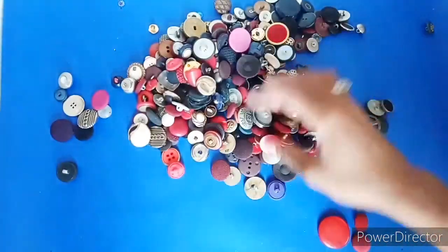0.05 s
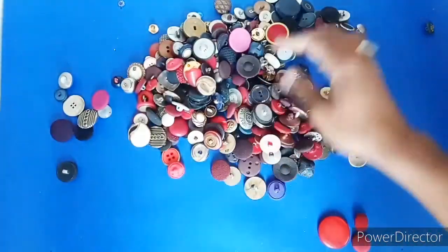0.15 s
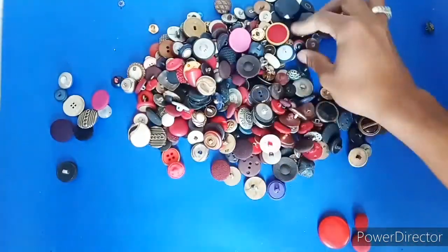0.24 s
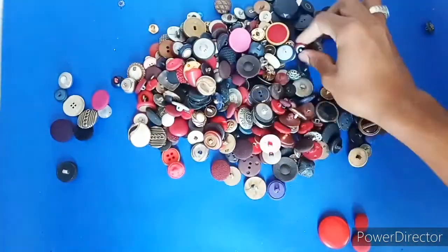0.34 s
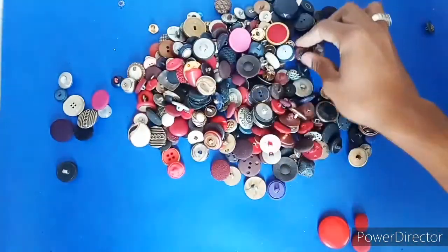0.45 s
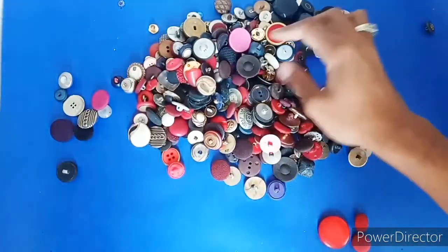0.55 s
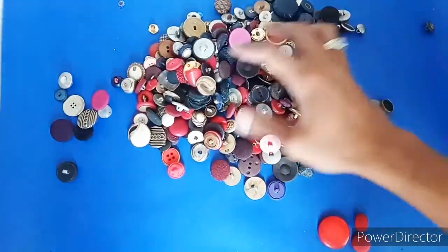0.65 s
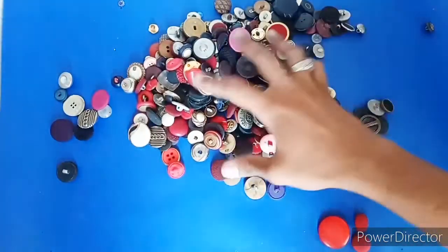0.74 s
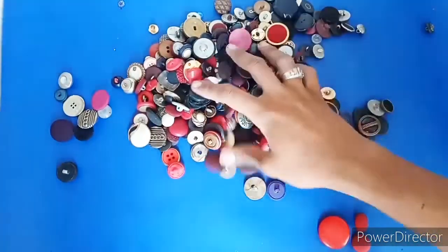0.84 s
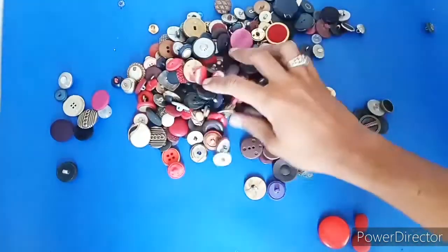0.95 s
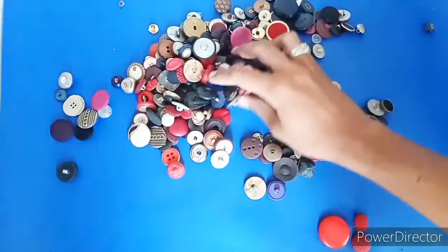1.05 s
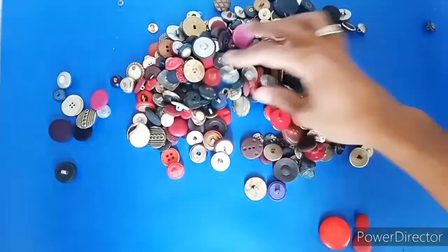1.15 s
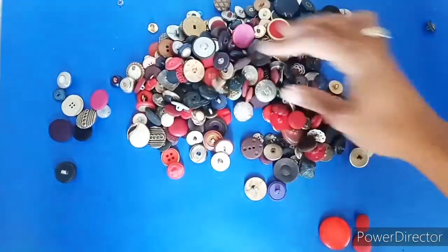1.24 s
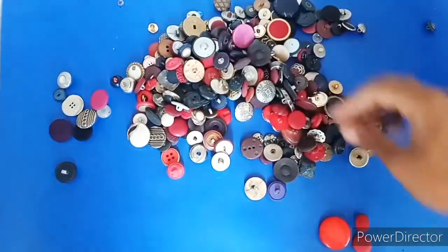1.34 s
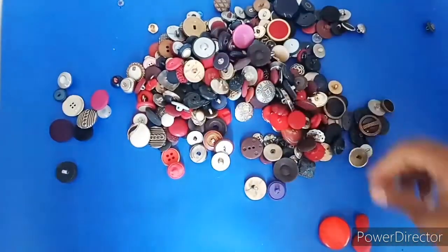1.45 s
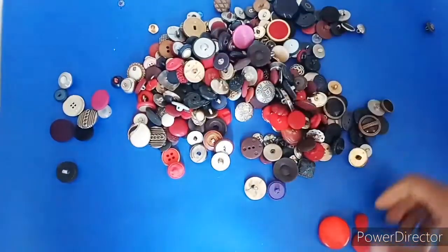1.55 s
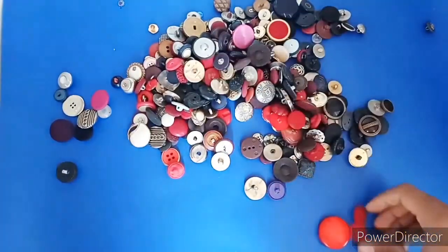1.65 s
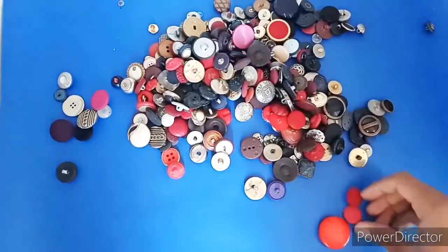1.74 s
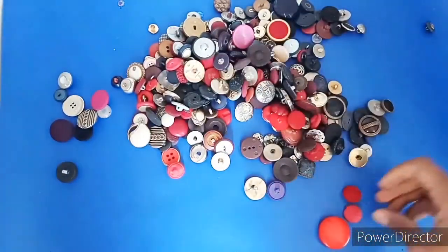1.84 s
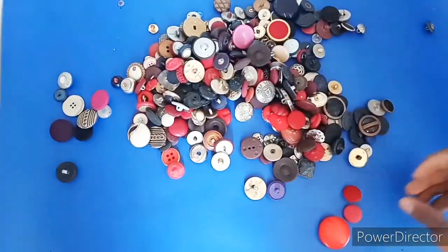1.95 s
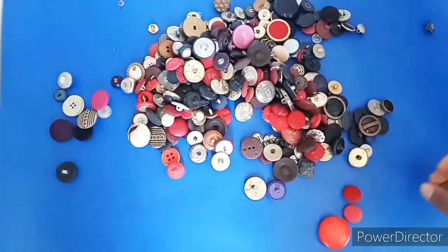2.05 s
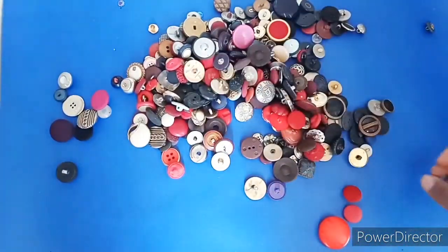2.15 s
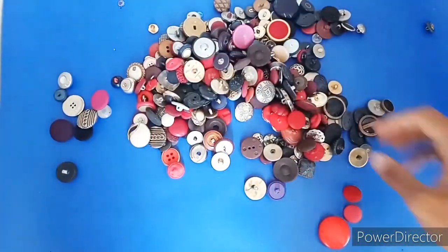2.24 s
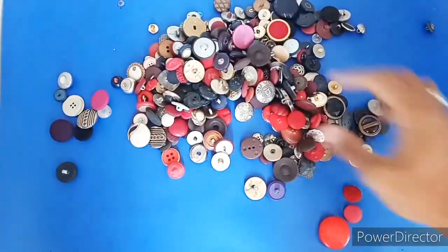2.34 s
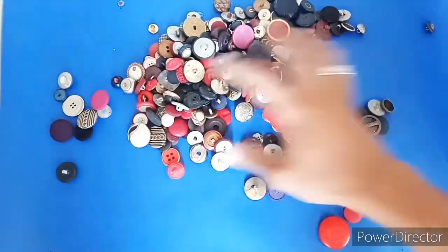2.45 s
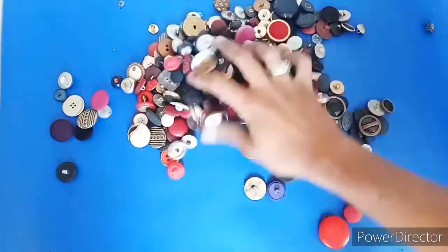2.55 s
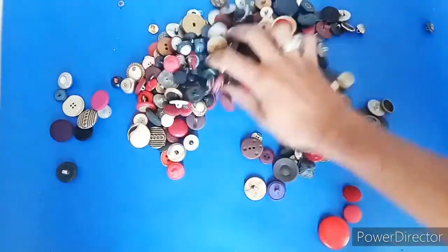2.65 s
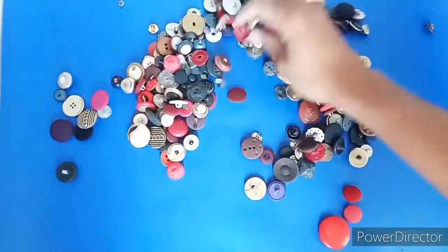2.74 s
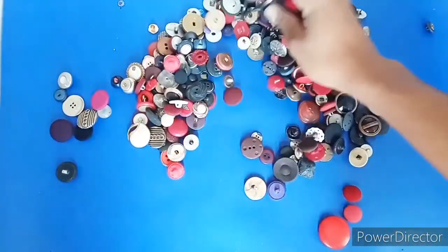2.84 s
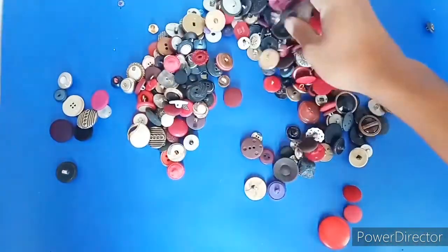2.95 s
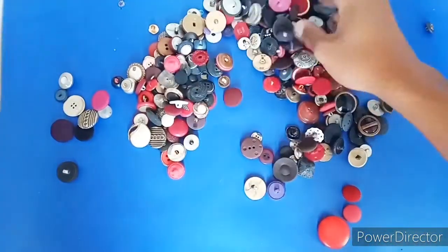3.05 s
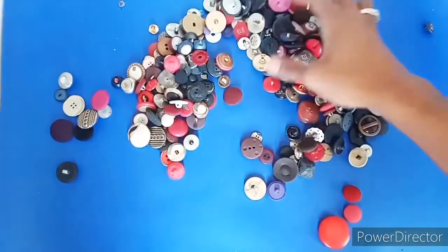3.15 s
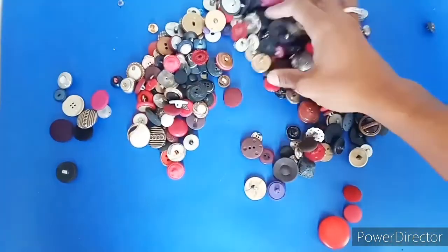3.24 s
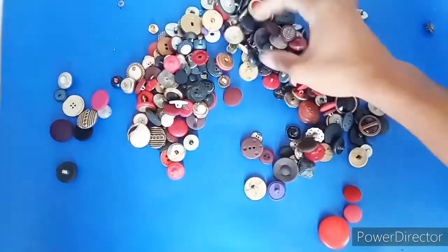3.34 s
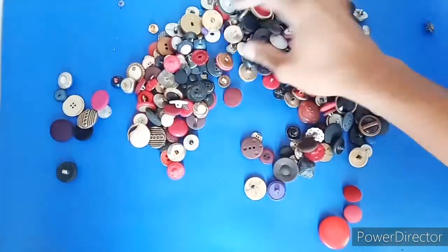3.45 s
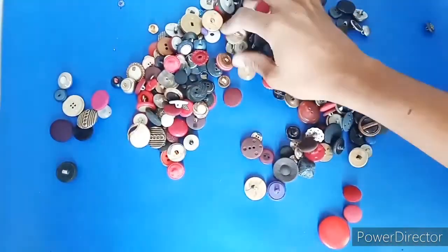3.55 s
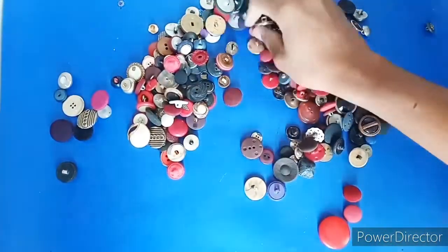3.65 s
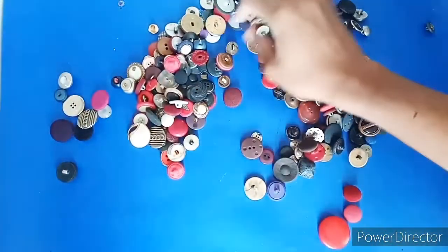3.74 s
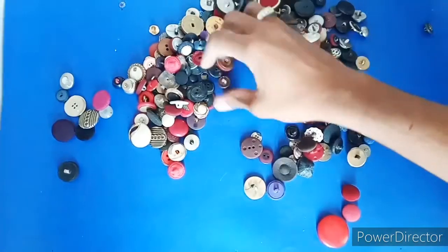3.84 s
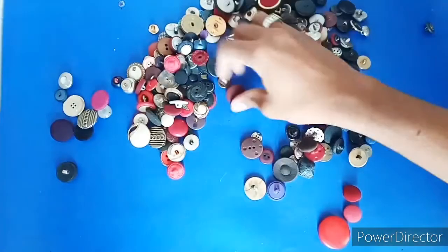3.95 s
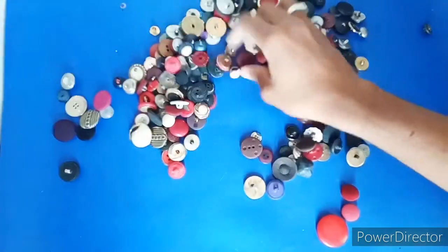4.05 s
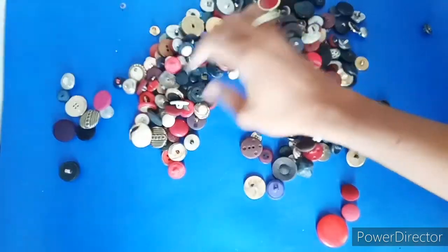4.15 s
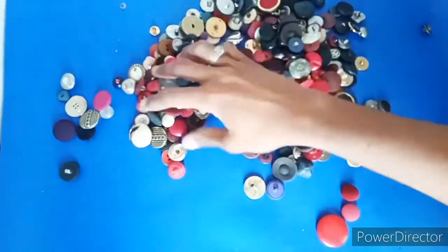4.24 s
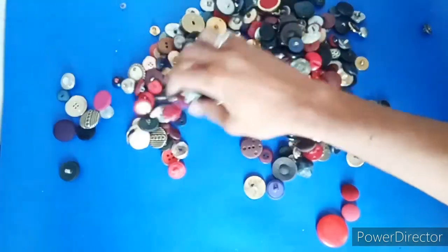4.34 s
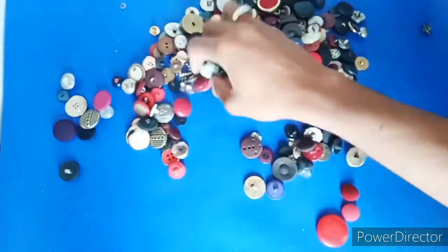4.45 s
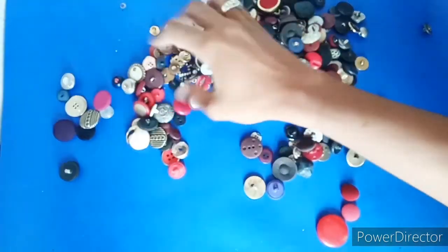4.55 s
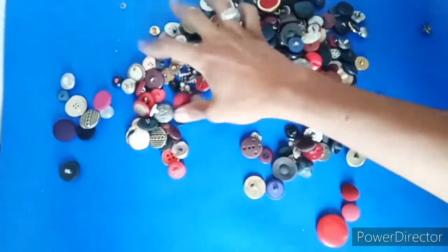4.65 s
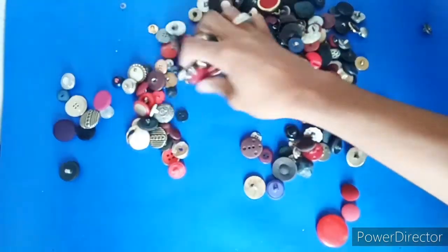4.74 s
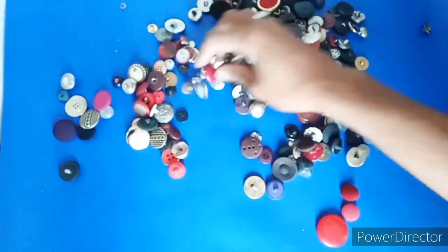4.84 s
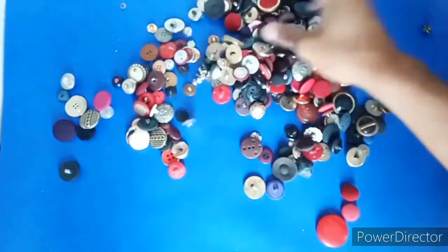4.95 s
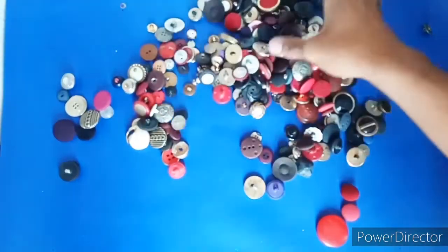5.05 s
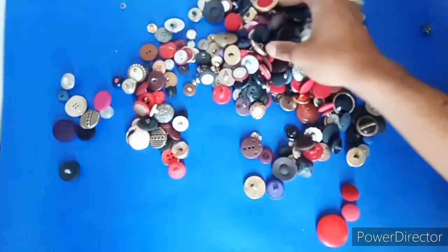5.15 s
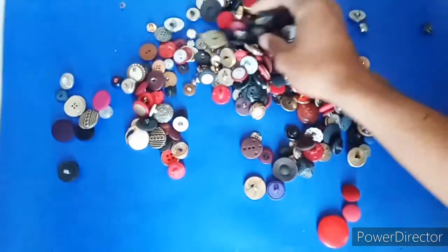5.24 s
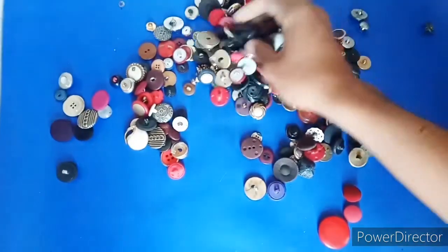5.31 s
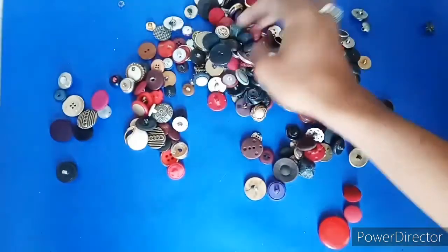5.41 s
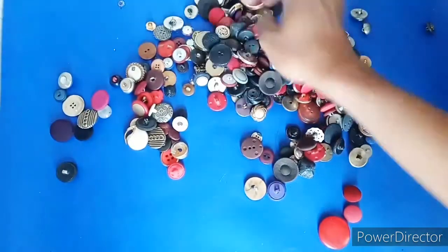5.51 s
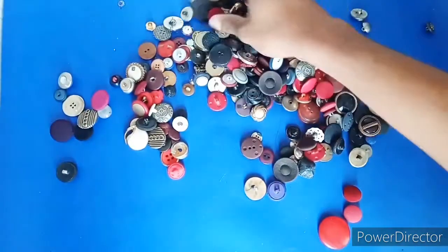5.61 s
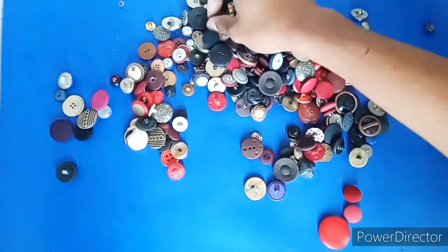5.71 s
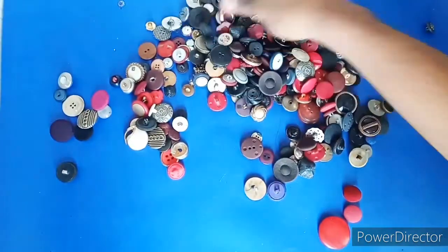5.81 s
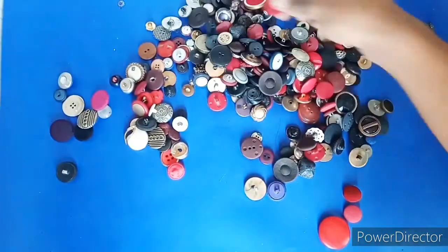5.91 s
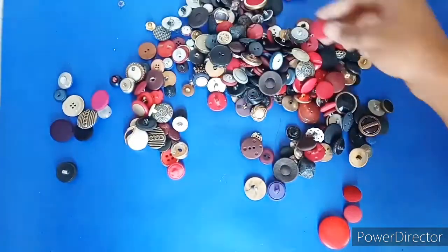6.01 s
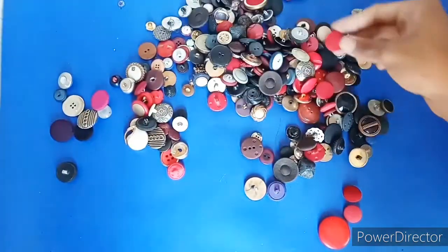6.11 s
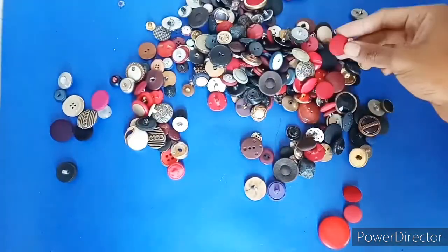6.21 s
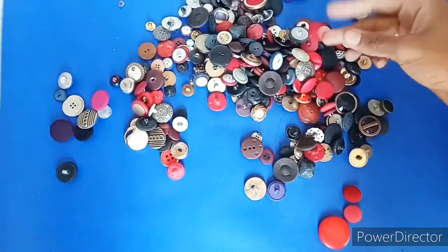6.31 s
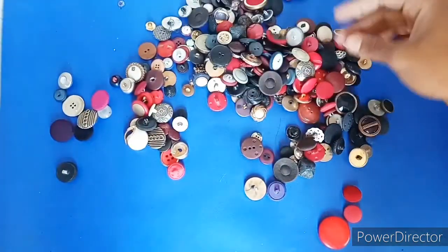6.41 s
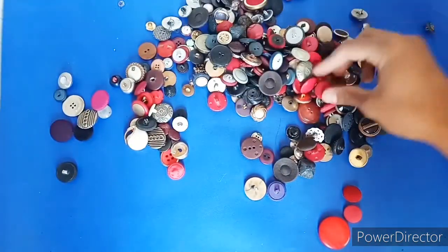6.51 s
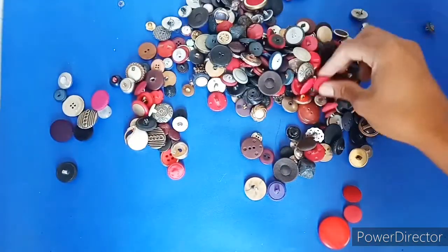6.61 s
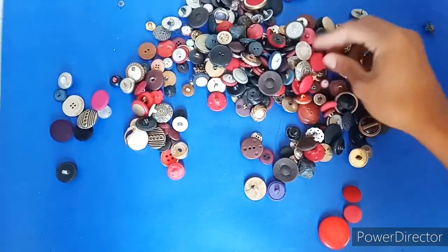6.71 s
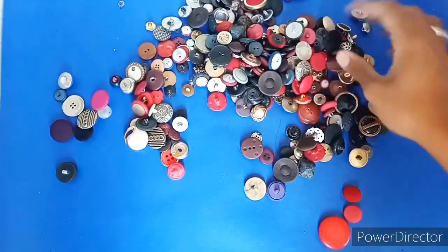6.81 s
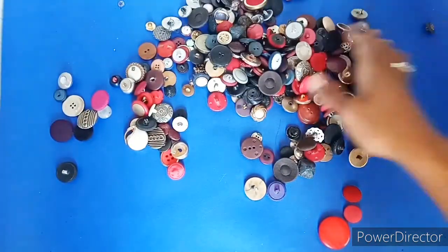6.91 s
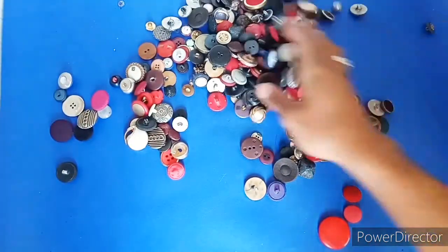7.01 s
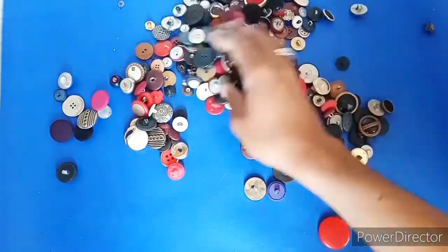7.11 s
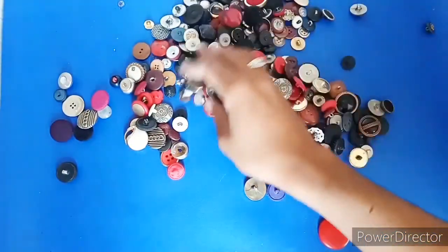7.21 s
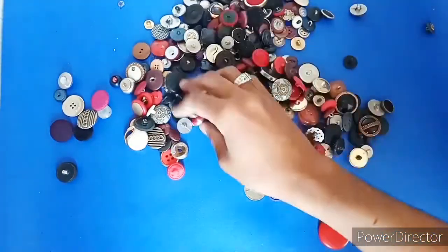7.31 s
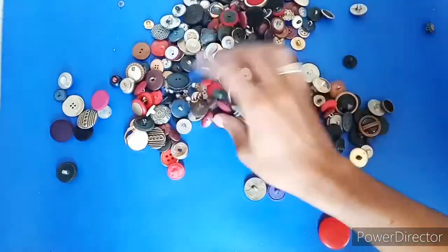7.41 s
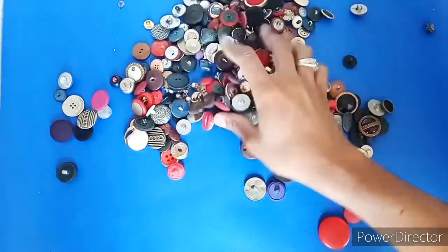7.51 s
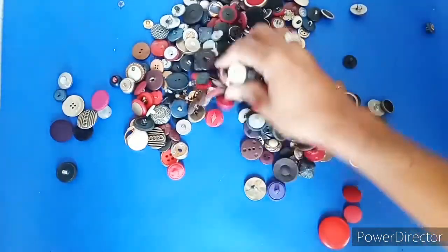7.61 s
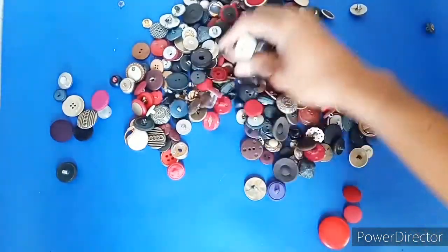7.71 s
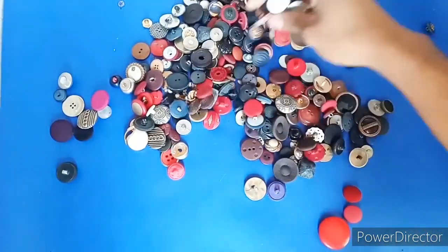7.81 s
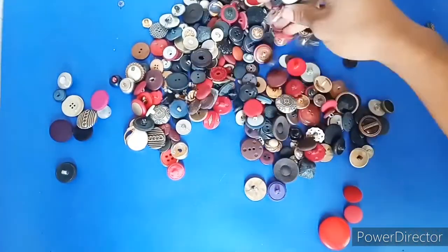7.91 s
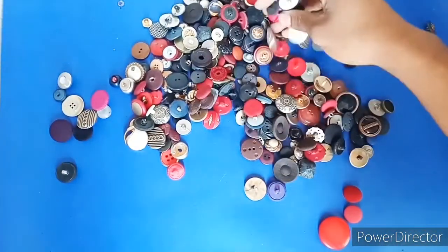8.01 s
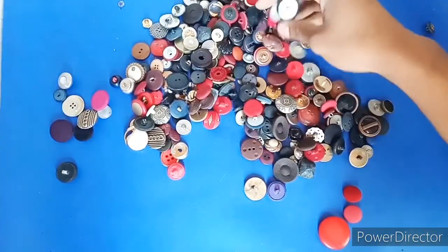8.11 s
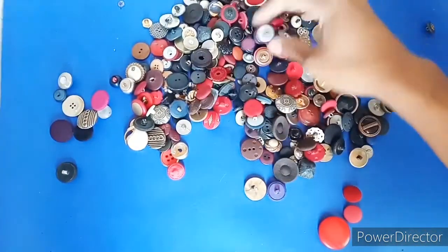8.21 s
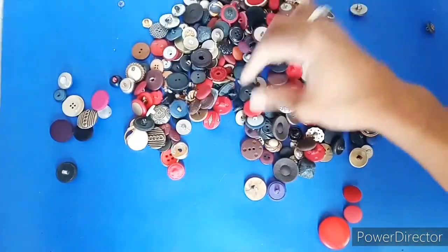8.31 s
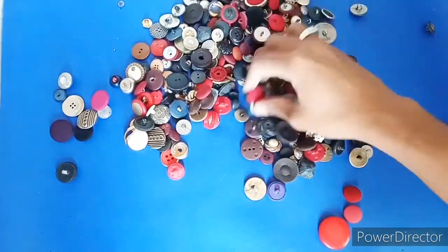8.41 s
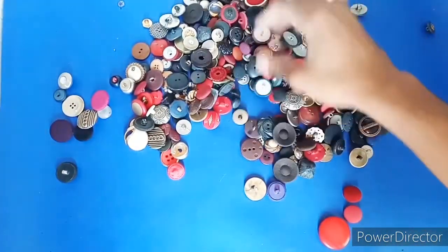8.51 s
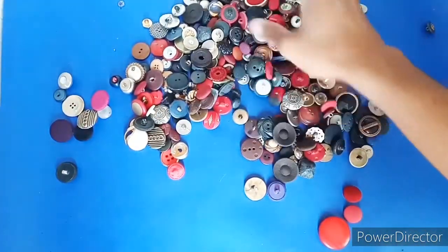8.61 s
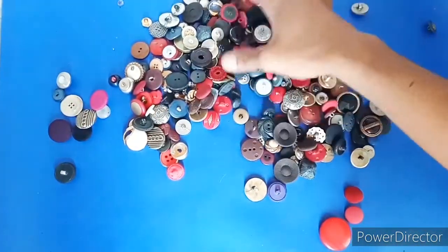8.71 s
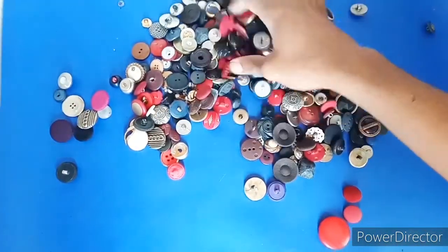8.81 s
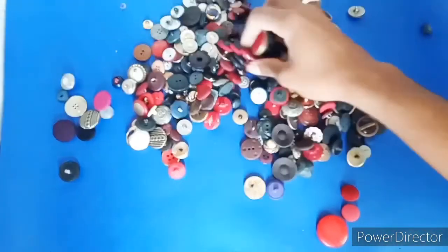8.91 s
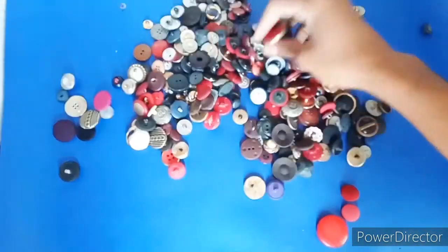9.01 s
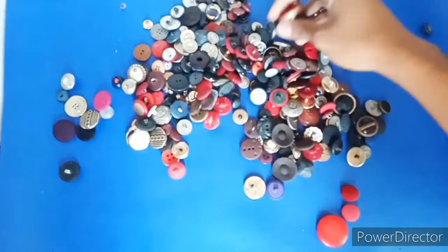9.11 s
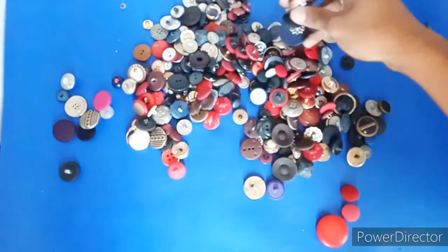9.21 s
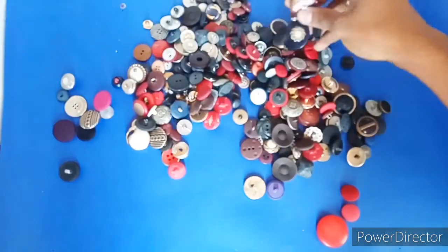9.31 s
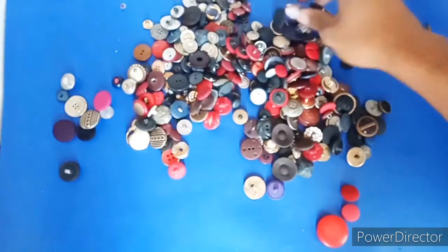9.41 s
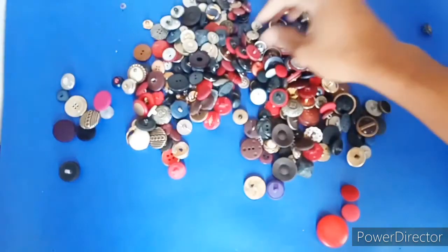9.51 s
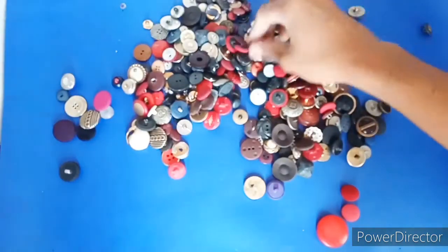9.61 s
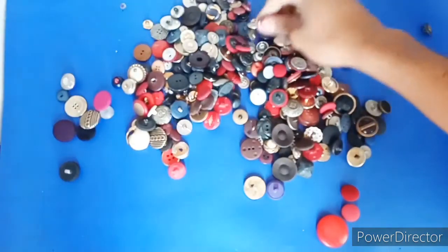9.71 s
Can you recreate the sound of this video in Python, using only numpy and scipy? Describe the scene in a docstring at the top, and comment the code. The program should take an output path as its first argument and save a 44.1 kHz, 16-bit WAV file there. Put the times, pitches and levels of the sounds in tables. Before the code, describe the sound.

Close-up stirring of a button heap: crowds of short bright clicks mixed with woody, damped tabletop knocks. Quiet, scattered taps give way to dense tumbling handfuls, then a lull with barely a tick, then renewed rattling with a few heavy thumps. Occasional thin metallic singing and tiny high pings slip through. Small room with little echo, and pauses sink almost to silence.

```python
"""Raking a heap of buttons

A hand rakes, lifts and drops a heap of plastic and metal buttons on a thin hollow table top, heard close up.
Each collision is a short bright click of the buttons plus a duller knock that rings damped table modes;
a few metal buttons sing thin tones as they spin or wobble, and one small one pings when struck.
Low noise rumbles with the hand; a small room answers briefly over a faint steady hush."""
import sys
import numpy as np
from scipy import signal
from scipy.io import wavfile
from scipy.ndimage import uniform_filter1d, minimum_filter1d

SR = 44100
rng = np.random.default_rng(int(sys.argv[2]) if len(sys.argv) > 2 else 0)


def digitize_waveform(pressure):
    """Quantize a signal to 16-bit integers and store it at the path in sys.argv[1].

    Rows of a 2-D input are taken as channels; values are limited to [-1, 1].
    """
    field = np.atleast_2d(pressure).T
    bounded = np.clip(field, -1, 1)
    quanta = np.round(bounded * 32767).astype(np.int16)
    wavfile.write(sys.argv[1], SR, quanta)


N = 430416

# single loud collisions; levels are relative, click and edge count from the peak:
# start_s, peak_db, click_db, edge_db, click_pitch_hz, struck_spot_pitch_hz
LOUD_HITS = [(0.029, -25.5, -10, -20, 4440, 1260), (0.075, -30, -5, -33, 3370, 950),
             (0.225, -26, -25, -22, 3180, 608), (0.386, -22, -27, -45, 2780, 860),
             (0.448, -19.5, -28, -48, 3740, 900), (0.568, -50, -12, -25, 3210, 870),
             (0.601, -32, -21.5, -34, 2320, 850), (0.622, -37, -22, -38, 3070, 899),
             (0.949, -20, -17, -24, 4400, 614), (1.0, -16, -21, -25, 4150, 600),
             (1.287, -18, -17.5, -30, 4500, 598), (1.332, -17.5, -17, -27, 4750, 473),
             (1.41, -40, 0, -5, 3970, 940), (1.518, -31.5, -14, -41, 2500, 1940),
             (1.598, -33, -21, -45, 3140, 1880), (1.72, -32, -8, -35, 2920, 1240),
             (1.816, -37, -9, -19, 2310, 1010), (1.835, -33, -6, -35, 3160, 1800),
             (2.098, -50, -14, -35, 3290, 778), (2.189, -35, -20, -39, 3140, 1670),
             (2.49, -49, -12, -39, 2920, 536), (2.574, -39, -18, -40, 2600, 1620),
             (2.656, -9.5, -19.5, -28, 4250, 930), (2.687, -16, -12, -32, 2300, 910),
             (2.823, -15, -7, -36, 2400, 900), (2.986, -17.5, -19, -26, 2850, 590),
             (3.071, -30, -11, -28, 3370, 575), (3.088, -11.5, -14, -22, 4490, 966),
             (3.127, -18.5, -16, -31, 3930, 880), (3.166, -10.5, -21.5, -41, 3240, 867),
             (3.263, -32, -10, -15, 3180, 900), (3.329, -36, -1, -7, 2470, 950),
             (3.35, -22.5, -12, -32, 2470, 1630), (3.376, -19.5, -11, -34, 3300, 875),
             (3.402, -14, -20, -34, 2660, 1560), (3.421, -12.5, -7.5, -40, 2820, 1570),
             (3.521, -23, -9, -14, 4600, 1680), (3.591, -38, -13, -19, 5080, 600),
             (3.64, -27, -11.5, -23, 4030, 829), (3.655, -15, -24, -28, 4550, 850),
             (3.708, -16, -17, -35, 3170, 1620), (3.878, -44, -8, -22, 2980, 595),
             (3.915, -11.5, -22.5, -31, 3800, 900), (3.946, -8.5, -30, -36, 3670, 652),
             (4.102, -41, -14, -7, 2660, 1550), (4.114, -37.5, -6, -1.5, 5900, 1490),
             (4.147, -25, -20, -25, 3920, 1630), (4.208, -26, -18, -30, 5400, 740),
             (4.228, -27.5, -12.5, -16, 3870, 640), (4.415, -25.5, -23.5, -39.5, 2600, 960),
             (4.449, -23, -21, -33, 4370, 1050), (4.463, -23.5, -18, -19, 4300, 580),
             (4.489, -8, -32, -30, 3550, 1040), (4.529, -13.5, -22, -30, 3600, 614),
             (4.556, -10.5, -24, -30, 3820, 615), (4.637, -17.5, -13, -26, 3660, 650),
             (4.677, -26, -12, -28, 3560, 692), (4.796, -8, -20, -45, 3700, 653),
             (4.884, -11, -4.5, -36, 3710, 650), (5.003, -5, -21, -35, 2300, 990),
             (5.04, -12.5, -17, -24, 2950, 620), (5.083, -16, -15, -21, 2930, 925),
             (5.131, -28, -14, -31, 2380, 930), (5.197, -25, -7.5, -21, 2400, 581),
             (5.22, -20, -15, -25, 3220, 850), (5.269, -16.5, -8.5, -16, 2560, 904),
             (5.351, -15, -18, -35, 3490, 900), (5.417, -16.5, -19, -22, 3750, 646),
             (5.519, -20.5, -15.5, -21, 3920, 554), (5.736, -31.5, -16.5, -45, 2400, 625),
             (5.759, -36, -9, -41, 3140, 762), (5.779, -27, -5.5, -40, 2600, 643),
             (5.807, -9.5, -27, -45, 2970, 780), (5.938, -18.5, -18.5, -32, 2970, 672),
             (6.104, -41.5, -7.5, -35.5, 3390, 1080), (6.521, -49.5, -11, -20, 4030, 514),
             (6.54, -30, -21, -37, 4180, 870), (6.579, -37.5, -17, -33, 3800, 860),
             (6.682, -28, -14, -21, 4950, 485), (6.747, -27, -32, -38, 2350, 617),
             (6.794, -31.5, -12, -25, 3740, 900), (6.82, -23.5, -8.5, -18.5, 2950, 597),
             (6.863, -26, -20, -23, 2730, 616), (6.931, -39, -8, -40, 2980, 880),
             (7.056, -39.5, 0.5, -12, 3040, 554), (7.09, -18.5, -11, -9, 4080, 614),
             (7.118, -15, -10.5, -24, 4230, 899), (7.143, -16, -11, -29, 4360, 900),
             (7.316, -8.5, -19.5, -37, 3160, 860), (7.342, -19.5, -19, -22, 3860, 635),
             (7.374, -14.5, -17.5, -32, 3550, 636), (7.424, -10.5, -22.5, -47, 3580, 633),
             (7.526, -24, -20, -38, 4570, 603), (7.545, -16, -22, -35, 3500, 616),
             (7.6, -18.5, -20, -29, 4080, 583), (7.668, -29.5, -23, -22, 4020, 616),
             (7.679, -12, -24, -36, 4340, 870), (7.706, -20.5, -6.5, -20, 3780, 596),
             (7.761, -10.5, -15.5, -30, 3770, 584), (7.885, -11.5, -25, -32, 2630, 616),
             (7.928, -20, -14, -16.5, 4100, 624), (7.968, -18.5, -29, -32, 3940, 610),
             (8.069, 2.5, -37.5, -34.5, 4340, 662), (8.128, -12.5, -21, -26, 3060, 918),
             (8.159, -3, -13.5, -32, 2530, 920), (8.186, -13, -20, -34, 2700, 929),
             (8.275, -19.5, -30, -35, 3720, 630), (8.299, -9, -22, -28.5, 2600, 900),
             (8.377, -27.5, -34, -46, 4010, 895), (8.449, -31, -25, -24, 3820, 883),
             (8.519, -28.5, -18, -30, 3600, 764), (8.533, -23.5, -11.5, -26, 4140, 624),
             (8.56, -17, -20, -25, 4400, 615), (8.652, -23.5, -4.5, -15, 4300, 616),
             (8.777, -50, -11.5, -23, 4650, 514), (8.821, -31, -12, -35, 2990, 820),
             (8.827, -31.5, -12, -27, 3060, 646), (8.859, -19.5, -10, -38, 3800, 910),
             (8.962, -18.5, -10, -40, 3120, 800), (9.004, -11.5, -17, -41, 4200, 899),
             (9.04, -14.5, -5, -36, 3000, 870), (9.138, -18.5, -19, -27, 3540, 1620),
             (9.157, -17, -9.5, -17, 3770, 1630), (9.202, -26, -9, -29, 3500, 818),
             (9.248, -18.5, -24, -46, 2660, 920), (9.306, -39.5, 0.5, -26, 2620, 915),
             (9.377, -49, -10, -25, 4020, 867), (9.401, -27.5, -25, -38, 3700, 930),
             (9.418, -24, -9.5, -17, 2640, 900), (9.489, -30.5, 1, -15, 2670, 510),
             (9.51, -11.5, -11, -33, 2900, 643), (9.57, 0.5, -9, -52, 2760, 878),
             (9.629, -7.5, -18.5, -32, 2300, 885), (9.726, -50, -6, -29, 3150, 536)]


def amp(db):
    """Decibels to gain."""
    return 10 ** (np.asarray(db) / 20)


def unit(x):
    """Scales a short sound to energy 1."""
    return x / np.sqrt(np.sum(x ** 2) + 1e-30)


def read(points, hz):
    """Interpolates a frequency table on a log-frequency axis."""
    table_hz, value = np.transpose(points)
    return np.interp(np.log(hz + 1), np.log(table_hz + 1), value)


def causal(points, size=1024):
    """Minimum-phase response of a spectrum table, energy 1."""
    bin_hz = abs(np.fft.fftfreq(4 * size, 1 / SR))
    log_gain = np.log(amp(np.maximum(read(points, bin_hz), -100)))
    spectrum = np.exp(np.conj(signal.hilbert(log_gain)))
    return unit(np.fft.ifft(spectrum).real[:size])


def noise(points):
    """Steady noise through the unit-energy response of a spectrum table, rms about 1."""
    return signal.oaconvolve(rng.standard_normal(N), causal(points, size=4096))[:N]


def ring(hz, t60_s, rise_s):
    """A damped mode: a decaying sine with a soft start, 0.15 s long."""
    t = np.arange(round(.15 * SR)) / SR
    return amp(-60 * t / t60_s) * (1 - np.exp(-t / rise_s)) * np.sin(2 * np.pi * hz * t)


def collisions(per_s, spread_db):
    """Random impulses of mean power 1; exponential spread in dB makes a few large."""
    size = amp(spread_db * np.minimum(rng.exponential(1, N), 4))
    size = size * (rng.random(N) < per_s / SR)
    return size / np.sqrt(np.mean(size ** 2))


def bounces(count=3):
    """A loud collision is a quick stutter of contacts: delays (samples) and signed sizes, one row a hit."""
    draw = rng.random((len(LOUD_HITS), count, 3))
    delay = np.cumsum(draw[..., 0] * .003 * SR, axis=1)
    drop_db = -0.5 + 14.0 * draw[..., 1]
    size = amp(-drop_db * np.arange(count)) * np.sign(draw[..., 2] - .5)
    return (delay - delay[:, :1]).astype(int), size


def hit_train(gain, delay, size):
    """Impulses at the contacts of the loud collisions."""
    train = np.zeros(N)
    start = np.round(np.array(LOUD_HITS)[:, :1] * SR).astype(int)
    np.add.at(train, np.minimum(start + delay, N - 1), gain[:, None] * size)
    return train


def stirring():
    """Hand movements set the heap's rattle and the clicking relative to it, in dB per sample."""
    # one table a hand movement: time_s, rattle_db, clicking_over_rattle_db
    movements = [
        [(0.0, -47, -8), (0.096, -37.5, -3), (0.11, -37, -2), (0.164, -48.5, -5), (0.218, -55.5, -4),
         (0.228, -48.5, -3.5), (0.296, -71.5, -2), (0.332, -67, -15), (0.36, -86, 16)],
        [(0.37, -66, 6), (0.388, -39.5, -19), (0.406, -46, -2), (0.438, -46, -10), (0.446, -33.5, -18.5),
         (0.562, -66, -3), (0.6, -60.5, -9), (0.788, -70.5, -3.5), (0.93, -62, -5)],
        [(0.94, -46, -2), (0.952, -32.5, -4), (0.99, -47, 3), (0.998, -34, -4), (1.136, -36.5, -0.5),
         (1.34, -40, -6), (1.478, -70.5, 4), (1.524, -55.5, -5), (1.7, -60.5, -5)],
        [(1.71, -65, 16), (1.732, -56.5, -2), (1.796, -62.5, 14), (1.852, -54, 8), (2.072, -76, -15),
         (2.112, -57, -3.5), (2.204, -57, -7.5), (2.274, -66.5, -12), (2.47, -75, -12)],
        [(2.48, -68, -10), (2.492, -56.5, -5), (2.636, -55, -10), (2.656, -26.5, -4), (2.862, -26, -0.5),
         (2.984, -38, -6), (2.994, -31, -11.5), (3.066, -59, -1), (3.07, -47, -7)],
        [(3.08, -48, -10), (3.088, -26, 0.5), (3.124, -33.5, -9), (3.326, -57, 0.5), (3.382, -33, 0.5),
         (3.408, -28, -11), (3.428, -36, 5), (3.434, -27, -6.5), (3.63, -56.5, -7.5)],
        [(3.64, -43, 0), (3.66, -35, -10), (3.682, -35.5, -8), (3.72, -27.5, -5), (3.74, -27.5, -7),
         (3.794, -35, 1.5), (3.86, -52.5, -8), (3.882, -47, -15), (3.9, -58, -10)],
        [(3.91, -33, -12), (3.916, -37, -21), (3.932, -41, -6), (3.95, -23.5, -26), (3.972, -43, -5),
         (4.08, -55.5, 3), (4.246, -46.5, -8.5), (4.314, -89.5, -2), (4.4, -83.5, -9.5)],
        [(4.41, -66, -17.5), (4.414, -46.5, -13), (4.496, -21, -8), (4.504, -27.5, -3), (4.562, -26.5, -7.5),
         (4.572, -34, -1), (4.62, -44, -10), (4.652, -30, -10.5), (4.78, -68, -8)],
        [(4.79, -34, -15), (4.794, -27, -5.5), (4.876, -28.5, -6.5), (4.882, -25, -3), (4.994, -34.5, -4.5),
         (5.006, -19, -27), (5.022, -35, -7), (5.04, -22.5, -6.5), (5.19, -43.5, -8.5)],
        [(5.2, -40, -1), (5.252, -41, 0), (5.272, -29.5, -1), (5.344, -35.5, -3), (5.35, -27.5, -6.5),
         (5.396, -34.5, -6), (5.438, -26, -6), (5.582, -46, -3), (5.7, -85.5, 5)],
        [(5.71, -100, -1.5), (5.734, -46.5, -8), (5.82, -39.5, -15), (5.864, -45, -3.5), (5.956, -44.5, -9.5),
         (6.068, -89.5, -6), (6.112, -57, -3), (6.16, -91, -5.5), (6.5, -88.5, -11.5)],
        [(6.51, -91.5, 7.5), (6.544, -48, -10), (6.66, -71.5, -9), (6.686, -42.5, -11), (6.74, -54, -4),
         (6.748, -42, -17), (6.77, -43, -9), (6.834, -35, -5), (7.04, -88, 0)],
        [(7.05, -65, 0.5), (7.09, -37.5, 3), (7.148, -20.5, -9), (7.152, -26, 1), (7.288, -31.5, -4.5),
         (7.422, -27, -10), (7.51, -40, -1.5), (7.562, -34.5, -6.5), (7.66, -50, -6)],
        [(7.67, -37, -3.5), (7.676, -34.5, -3.5), (7.772, -25, -5), (7.784, -34.5, -2.5), (7.88, -42, -1),
         (7.884, -32.5, -29), (7.954, -41.5, -1), (7.968, -30.5, -20), (8.05, -65.5, -2)],
        [(8.06, -45, -23), (8.068, -20.5, -18.5), (8.126, -32, -15), (8.168, -23, -11), (8.254, -44, -10),
         (8.308, -29, -13), (8.364, -44.5, -14), (8.39, -41, -16), (8.5, -56, -7)],
        [(8.51, -54, -14), (8.524, -44, -2), (8.566, -36.5, -2.5), (8.576, -38, 0.5), (8.592, -32, -7),
         (8.638, -46.5, -9), (8.658, -52.5, -1.5), (8.742, -81.5, -3), (8.8, -61.5, -5)],
        [(8.81, -58, -12.5), (8.868, -34, -0.5), (9.018, -28.5, -3), (9.152, -38.5, -5), (9.18, -33.5, -2),
         (9.24, -52, -0.5), (9.252, -42, -25), (9.282, -54.5, 3), (9.38, -58, -12)],
        [(9.39, -59, -16), (9.402, -38.5, -11), (9.498, -61.5, 2), (9.512, -24.5, -3.5), (9.544, -35, -12),
         (9.568, -24, -4.5), (9.652, -34, -14), (9.704, -67, -7), (9.76, -42.5, -8)],
    ]
    rows = np.concatenate(movements)
    return [np.interp(np.arange(N) / SR, rows[:, 0], rows[:, k]) for k in (1, 2)]


def hush():
    """Faint steady background of coloured noise."""
    # background colour: freq_hz, level_db_per_hz
    colour = [(24, -42.5), (40, -24), (188, 3.5), (374, -7.5), (627, -10), (1560, -14), (1990, -11),
              (2550, -12), (6170, -33), (14200, -35.5)]
    return amp(-65.5) * noise(colour)


def rumble(rattle_db):
    """Low noise follows the stirring and swells when the hand or wrist leans on the table."""
    # rumble colour: freq_hz, level_db_per_hz
    colour = [(25, -24), (55, -12), (95, 0), (150, -4), (220, -11), (400, -40), (1500, -90)]
    # hand or wrist leaning on the table: start_s, length_s, level_db
    leans = [(0.56, 0.19, -47), (.74, 0.097, -62), (0.807, 0.22, -50), (1.817, 0.11, -65),
             (2.842, 0.056, -54), (4.79, 0.062, -48.5), (5.06, 0.044, -39), (5.297, 0.026, -52),
             (5.445, 0.043, -53), (7.288, 0.041, -53), (8.054, 0.073, -58)]
    base_db, reference_rattle_db, db_per_rattle_db = -63, -35, 0.26
    gain = amp(base_db + db_per_rattle_db * (rattle_db - reference_rattle_db))
    for start_s, length_s, level_db in leans:
        part = gain[round(start_s * SR):][:round(length_s * SR)]
        part += amp(level_db) * signal.windows.tukey(len(part), 0.41)
    return gain * noise(colour)


def spins():
    """A spinning button keeps one thin mode alive; its level throbs unevenly as the rim wobbles."""
    # singing metal buttons; throb_db is the swing of each of three sines:
    # start_s, end_s, pitch_hz, level_db, fade_by_end_db, throb_db
    singing = [(1.424, 1.56, 3290, -65, -3, 1.5), (1.42, 1.47, 3900, -70, -4, 1),
               (1.442, 1.6, 2530, -62, -2, 1.5), (1.44, 1.68, 1950, -61, -8, 2),
               (1.642, 1.78, 1230, -64, 0, 2), (3.015, 3.07, 4000, -56, -3, 2),
               (3.03, 3.085, 3540, -55, 1, 1), (3.005, 3.085, 4430, -60, -3, 2),
               (3.165, 3.33, 3220, -48, 0, 1.2), (3.275, 3.34, 1250, -53, 0, 1.5),
               (6.02, 6.13, 1820, -79, 0, 2), (6.2, 6.4, 1980, -80, -4, 3)]
    out = np.zeros(N)
    for start_s, end_s, hz, level_db, fade_db, throb_db in singing:
        t = np.arange(round((end_s - start_s) * SR)) / SR
        throb = sum(np.sin(2 * np.pi * (throb_hz * t + rng.random())) for throb_hz in (23., 41., 67.))
        gain = amp(level_db + fade_db * t / t[-1] + throb_db * throb)
        tone = np.sqrt(2) * gain * np.sin(2 * np.pi * hz * t)
        out[round(start_s * SR):][:len(t)] += tone * signal.windows.tukey(len(t), .15)
    return out


def pings():
    """One small metal button: the same thin high mode, struck now and then."""
    # strikes of the small button: start_s, strike_level_db
    strikes = [(3.264, -36.5), (3.3583, -34), (5.22, -28.5), (5.2799, -26), (6.5226, -52.5), (7.2474, -31),
               (9.154, -26.5), (9.418, -46)]
    start_s, level_db = np.transpose(strikes)
    train = np.zeros(N)
    train[np.round(start_s * SR).astype(int)] = amp(level_db)
    return signal.oaconvolve(train, ring(hz=7000, t60_s=0.029, rise_s=0.00035))[:N]


def edges(swarm, delay, size):
    """Sharp contacts add a thin, very high tick: a short decaying burst of noise."""
    # colour of the sharp edge: freq_hz, level_db_per_hz
    colour = [(3000, -29.5), (5500, 3.5), (7000, 0), (9000, -11.5), (12000, -18.5), (14200, -38.5)]
    _, peak_db, _, edge_db, _, _ = np.transpose(LOUD_HITS)
    train = hit_train(amp(peak_db + edge_db - 2.0), delay, size) + swarm
    decay = amp(-60 / (0.011 * SR))  # t60 11 ms
    burst = signal.lfilter([1], [1, -decay], abs(train)) * rng.standard_normal(N)
    return signal.oaconvolve(burst, causal(colour))[:N]


def clack(hz, t60_s, tick_db, overtone):
    """A button's own sound: a stubby mode, a higher overtone and a tick of noise."""
    t = np.arange(round(.15 * SR)) / SR
    tick_gain = amp(tick_db - 60 * t / 0.021) * (1 - np.exp(-t / 0.000067))
    tick = tick_gain * rng.standard_normal(len(t))
    high = overtone * ring(hz * rng.uniform(1.4, 2.1), 1.1 * t60_s, 0.00015)
    return ring(hz, t60_s, .0004) + high + tick


def buttons(swarm, delay, size, count=40):
    """Buttons of many sizes click together; the loud collisions keep their own pitch."""
    # colour of the clicks: freq_hz, level_db_per_hz
    click_colour = [(1060, -13), (1800, -11), (1910, -2.5), (2460, -4.5), (3660, -1), (4390, -0.5),
                    (6150, -25), (7240, -29), (8760, -29.5), (12000, -47), (13400, -50), (14200, -45.5)]
    colour = causal(click_colour)
    which = rng.integers(0, count, N)
    out = np.zeros(N)
    for k, hz in enumerate(np.geomspace(1800., 7000., count)):
        sound = unit(np.convolve(clack(hz, 0.018, -5, .4)[:2000], colour))
        out += signal.oaconvolve(swarm * (which == k), sound)[:N]
    for (start_s, peak_db, click_db, _, hz, _), lags, sizes in zip(LOUD_HITS, delay, size):
        sound = np.convolve(clack(hz, 0.013, -10, 0.4)[:2000], colour)
        sound = sound / abs(sound).max()
        for lag, contact in zip(lags, sizes):
            part = out[round(start_s * SR) + lag:][:len(sound)]
            part += amp(peak_db + click_db + 4.5) * contact * sound[:len(part)]
    return out


def table(swarm, delay, size):
    """Knocks drive each table mode by a different share, loud ones most near the pitch of the struck spot."""
    # table top modes; the ring after loud hits scales t60_s: freq_hz, level_db, t60_s
    modes = [(158, -16.5, 0.18), (274, -11.5, 0.079), (304.7, -4, 0.067), (440, -20, 0.045),
             (470.6, -3, 0.057), (576, 0.5, 0.015), (616, 4, 0.057), (685, -16.5, 0.02), (797, 2.5, 0.03),
             (899, 4.5, 0.028), (958, -6.5, 0.062), (1030, 0, 0.014), (1216, 2, 0.019), (1554, -1.5, 0.02),
             (1630, 2.5, 0.021), (1926, -1.5, 0.024), (2228, -10, 0.053)]
    knock_db = -5  # share of a loud collision that goes into the table
    _, peak_db, _, _, _, spot_hz = np.transpose(LOUD_HITS)
    luck = rng.uniform(0.27, 0.8, (len(LOUD_HITS), len(modes)))
    total = np.sqrt(sum(amp(2 * level_db) for _, level_db, _ in modes))
    out = np.zeros(N)
    for k, (hz, level_db, t60_s) in enumerate(modes):
        octaves = abs(np.log2(hz / spot_hz))
        near_db = -10. * np.minimum(octaves / 0.1, 1.5)
        wide_db = -12. * np.minimum(octaves / 1.2, 2)
        drive_db = peak_db + knock_db + level_db
        # the blow itself, short and wide
        blows = hit_train(amp(drive_db + wide_db) * luck[:, k], delay, size)
        out += amp(-5.5) * signal.oaconvolve(blows, ring(hz, 0.019, 0.00073))[:N]
        # the spot's own modes ring on
        lasting = hit_train(amp(drive_db + near_db - 6.5), delay, size)
        out += signal.oaconvolve(lasting, ring(hz, 1.49 * t60_s, 0.0019))[:N]
        # under the small knocks each mode is a close pair of pitches, 1.5% below and above
        for detune in (.985, 1.015):
            # small knocks favour a few modes each
            share = rng.standard_normal(N) * amp(3. * rng.standard_normal(N))
            share /= np.sqrt(2) * np.std(share)
            mode = amp(level_db) / total * unit(ring(hz * detune, t60_s, 0.00052))
            out += signal.oaconvolve(swarm * share, mode)[:N]
    return out


def room(x):
    """Small-room tail: sparse taps of random sign, each band dying at its own speed."""
    # decay of the room: freq_hz, t60_s
    decay = [(300, 0.32), (1400, 0.016), (4000, 0.11), (9000, 0.11)]
    taps = np.zeros(SR // 2)
    at = np.arange(120, SR // 2 - 20, 20)
    taps[at + rng.integers(0, 20, len(at))] = rng.choice([-1., 1.], len(at))
    hz, t, bands = signal.stft(taps, SR, nperseg=256)
    fade = amp(-60 * t / read(decay, hz)[:, None])
    tail = signal.istft(bands * fade, SR, nperseg=256)[1]
    return signal.oaconvolve(x, unit(tail))[:N]


def scene():
    """Knocks, clicks, spins and pings in the room, plus the hand's rumble and the hush."""
    rattle_db, bright_db = stirring()
    clicking = amp(rattle_db + bright_db)
    shared = collisions(700., 2.65)  # these sound in both table and buttons
    stutter = bounces()
    # lowest gain of the last 201 samples: the heap takes a moment to start rattling
    lagging = minimum_filter1d(amp(rattle_db), size=201, origin=100)
    knocks = table(lagging * shared, *stutter)
    button_swarm = 0.66 * shared + 0.62 * collisions(1200., 2.3)
    clicks = buttons(clicking * button_swarm, *stutter)
    clicks += edges(amp(-37.0) * clicking * collisions(450., 1.6), *stutter)
    # keep deep bass out of the knocks and clicks
    no_bass = signal.butter(4, 125., "high", fs=SR, output="sos")
    heap = signal.sosfilt(no_bass, knocks + clicks + spins() + pings())
    return (heap + amp(-11.0) * room(heap) + rumble(rattle_db) + hush())[None]


def record(dry):
    """A noise gate turns quiet moments down by up to 8 dB, peaks are rounded off, then the band limit."""
    power = uniform_filter1d(dry ** 2, size=900, axis=1)
    level_db = 10 * np.log10(abs(power) + 1e-12)
    shut = .5 - .5 * np.tanh((level_db + 58.5) / 3.8)  # 0 open, 1 shut
    gated = dry * amp(-8. * uniform_filter1d(shut, size=400, axis=1))
    rounded = gated / (1 + abs(gated / .92) ** 4) ** (1 / 4)
    low_pass = signal.firwin(511, 14200, window=("kaiser", 9), fs=SR)
    return signal.oaconvolve(rounded, low_pass[None], "same")


dry = scene()
out = record(dry)
digitize_waveform(out)
```